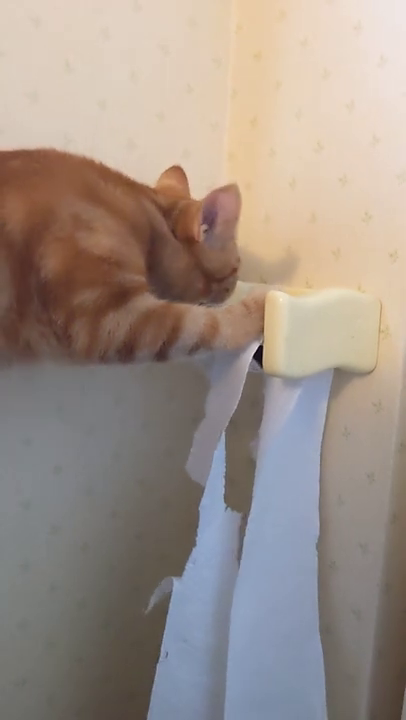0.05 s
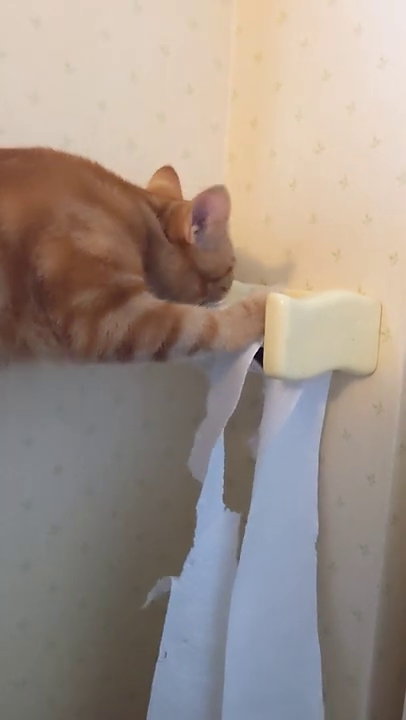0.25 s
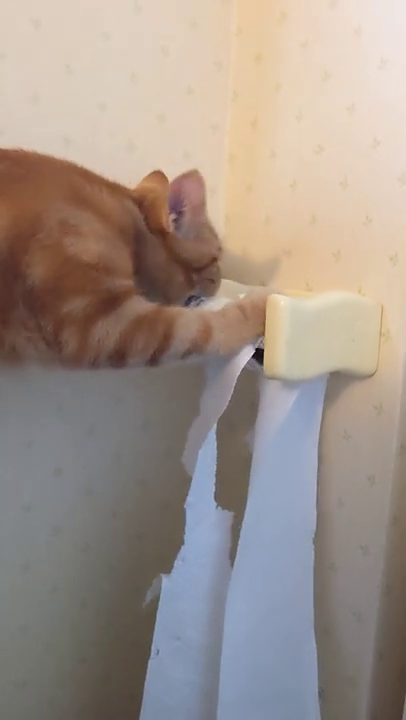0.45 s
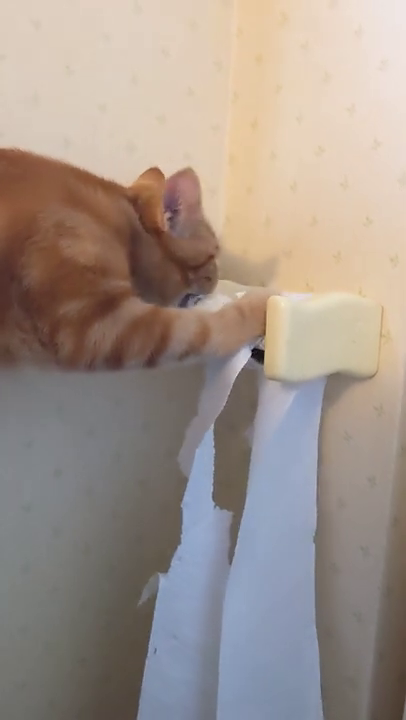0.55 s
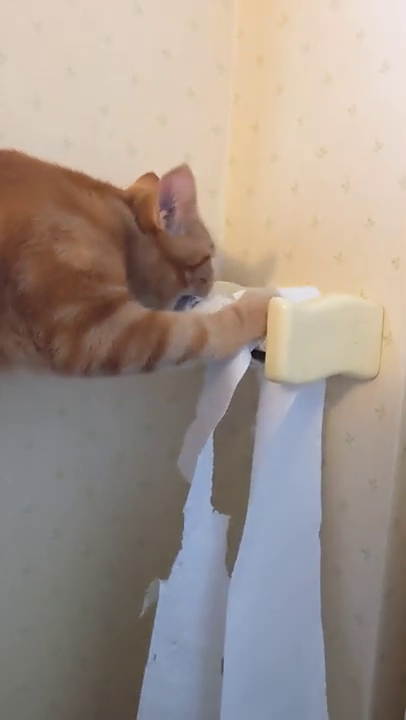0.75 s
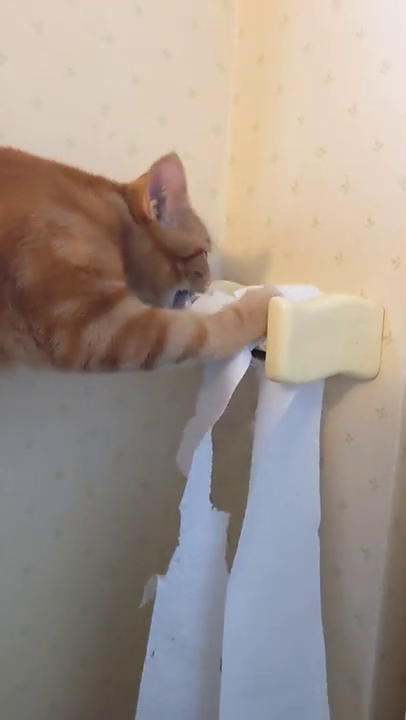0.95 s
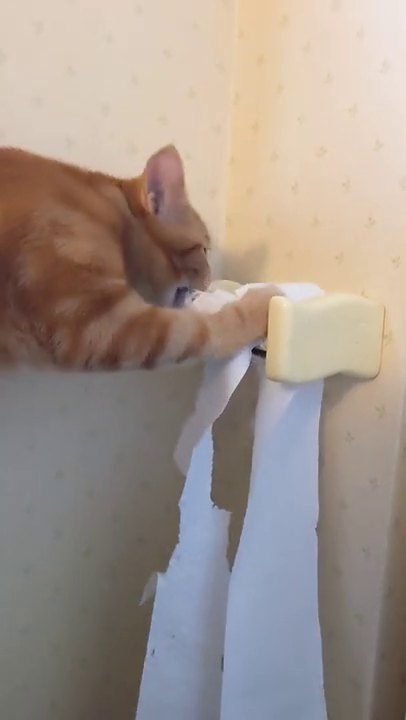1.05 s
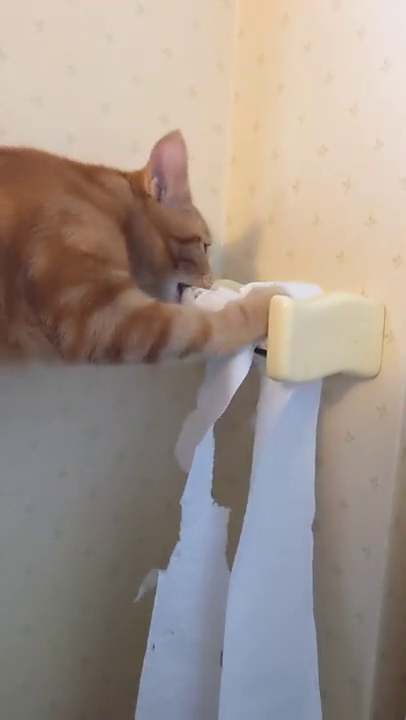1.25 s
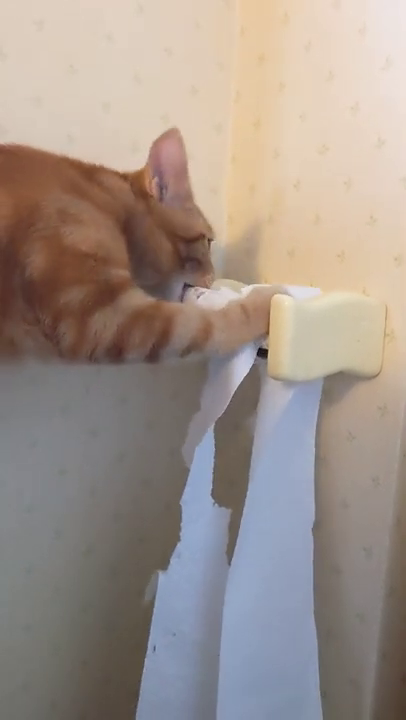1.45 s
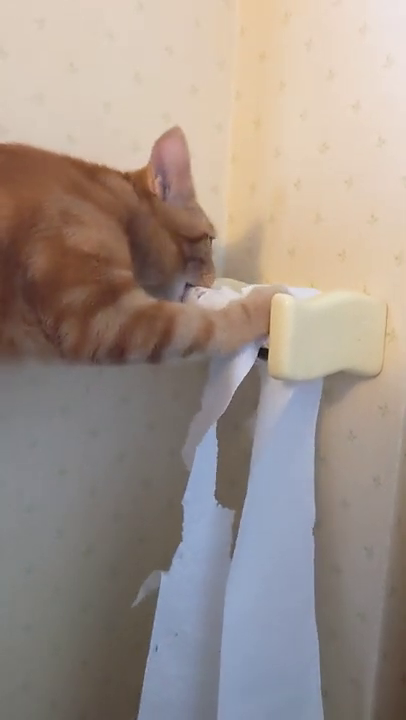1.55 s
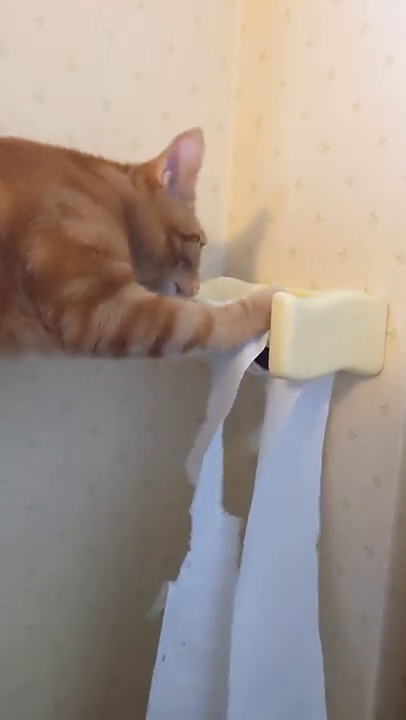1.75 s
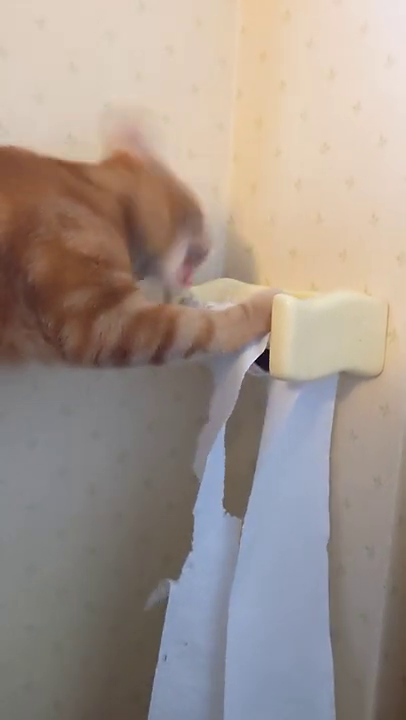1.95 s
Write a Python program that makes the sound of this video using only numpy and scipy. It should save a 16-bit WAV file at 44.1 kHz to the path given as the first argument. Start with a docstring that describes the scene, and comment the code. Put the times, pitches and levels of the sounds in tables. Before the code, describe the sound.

Plastic toilet roll holder knocking as a cat tugs the paper: a dense, uneven rattle of bright clacks with small hollow taps from 0.2 to 0.65 seconds, then near quiet. Faint clicks resume around 1.05, growing to a strong crack at 1.3 with low roll rubbing and soft paper rustle. One clear knock lands at 1.7. Close pickup, short hard-room echo, very faint hum and hiss.

```python
"""Cat tugging toilet paper

A cat tugs toilet paper off a wall holder in a small hard room, heard from a phone held close by.
The spindle slips and knocks in its plastic bracket: sharp pulses, with fading sine waves for bracket and wall.
Pushes of the paw drum the cardboard tube, also as fading sine waves, and each sound gets a room echo.
The roll rubs as it turns and the paper slides softly: both are coloured noise with a moving level.
Behind them lie a low house hum, a wavering sine wave, and noise for the room air and microphone hiss."""
import sys
import numpy as np
from scipy import signal
from scipy.fft import rfft, irfft, next_fast_len
from scipy.io import wavfile
from scipy.ndimage import map_coordinates

SR = 44100
rng = np.random.default_rng(int(sys.argv[2]) if len(sys.argv) > 2 else 0)


def amplitude_ratio(level_db):
    """Convert a level in decibels to the matching linear amplitude (field) ratio."""
    exponent = np.asarray(level_db, float) / 20
    return 10 ** exponent


def to_wav(s):
    """Save 16-bit WAV."""
    ch = np.atleast_2d(s).T  # columns
    pcm = np.round(np.clip(ch, -1, 1) * 32767)  # PCM
    wavfile.write(sys.argv[1], SR, pcm.astype(np.int16))


N = 88200  # samples: two seconds

# House hum over time: (time [s], level [dB])
HUM_LEVEL = [(0, -65), (.5, -61.5), (.9, -59.5), (1.19, -58), (1.23, -60), (1.28, -57.5), (1.65, -60.5),
             (1.8, -55.5), (2, -53)]
# Tone of room air and microphone hiss: (frequency [Hz], relative level [dB])
AIR_TONE = [(20, -15), (40, -25), (75, 2), (130, -6.5), (230, -8), (350, -10), (600, -15), (1100, -17.5),
            (2500, -22.5), (6000, -34), (10500, -49.5), (15500, -58), (16000, -78)]
# Paper sliding over time: (time [s], level [dB])
SLIDING_LEVEL = [(0.0, -66), (0.26, -81), (0.44, -62.5), (0.51, -82), (0.73, -76.5), (0.98, -75),
                 (1.06, -64.5), (1.25, -59), (1.45, -64), (1.71, -66.5), (1.87, -65), (2.0, -103)]
# Tone of the sliding paper: (frequency [Hz], relative level [dB])
PAPER_TONE = [(1000, 0.5), (3500, -0.5), (4800, 5), (6000, 3), (7500, -2.5), (12000, -9), (15500, -6),
              (15900, -45)]
# Roll rubbing on the spindle over time: (time [s], level [dB])
RUB_LEVEL = [(0.0, -59), (0.07, -61.5), (0.41, -61.5), (0.49, -50.5), (0.68, -59), (0.77, -70),
             (1.03, -62.5), (1.15, -64), (1.27, -54), (1.3, -43), (1.42, -54.5), (1.53, -65), (2.0, -62)]
# Tone of the rubbing: (frequency [Hz], relative level [dB])
RUB_TONE = [(70, -30), (130, -14.5), (200, -3.5), (270, 5), (340, 5.5), (420, -6.5), (620, -5.5),
            (900, -20), (1250, -11), (2000, -32.5)]
# Spindle knocks: (time [s], relative crack level [dB], wall thud over it [dB],
# bracket ring over it [dB], brightness [dB per octave])
KNOCKS = [(0.1017, -44.5, 0.5, -7.5, 1.3), (0.225, -49, -20, -17, 5), (0.2324, -26, -6, 4.5, -0.1),
          (.2400, -39.5, 2.5, 4, -5), (0.251, -40.5, -16, 6, 2.5), (0.2948, -29.5, -24, -14, -0.3),
          (.3160, -40, -11, -18, 6), (0.3371, -28, -15.5, -11.5, -2), (0.3639, -35.5, -17, -17, -5),
          (0.3894, -26.5, -16, -12, -1.5), (0.4128, -27, -36, -7.5, -0.4), (0.43, -28.5, -32.5, -20, -1.7),
          (0.4458, -45, -19, -21, 2), (.5260, -23, -25, -10, 0), (0.5948, -30, -39, -8, 1.5),
          (.6380, -27.5, -60, -13.5, -2.5), (0.6425, -32, -24, -7.5, 6), (0.9406, -60, -20, -4, 5),
          (1.0364, -44.5, -19, -10, 4.3), (1.05, -59, -15, -17, 5), (1.0905, -44, -5, -11, 8.5),
          (1.097, -41.5, -7, -8.5, 2), (1.1180, -41, -0.5, -3, -12), (1.1466, -30, -7.5, -8.5, 0.5),
          (1.1739, -31.5, -9.5, -7, -1.2), (1.2454, -30.5, -20, -11.5, 2.5), (1.259, -47, -28, -21, 4),
          (1.2908, -23, -23, -15.5, 4), (1.3770, -38.5, -16, -2.5, 3), (1.4180, -43, -13, -14.5, -1.5),
          (1.7135, -25, -2, -10.5, 5.5), (1.9399, -57, -2, -24, 1)]
# Tone of a crack: (frequency [Hz], relative level [dB])
CRACK_TONE = [(300, -18.5), (800, -23.5), (1300, 4.5), (2100, 3.5), (3200, 0), (4400, -0.5), (5600, -3.5),
              (7100, -5.5), (9000, -15.5), (12000, -20.5), (16000, -18.5)]
# Wall thump: (frequency [Hz], relative level [dB], time to fade by 60 dB [s])
WALL_MODES = [(216.6, -14.5, 0.17), (235, -8, 0.14), (267.2, -2.5, 0.15), (306.6, -2, 0.19),
              (336.5, -0.5, 0.1), (399.6, 1.5, 0.086)]
# Plastic bracket ringing: (frequency [Hz], relative level [dB], time to fade by 60 dB [s])
BRACKET_MODES = [(974, -36, 0.013), (1019.4, -4.5, 0.08), (1099, -9.5, 0.077), (1169, 0, 0.05),
                 (1212, 7, 0.022), (1306, -0.5, 0.076), (1300, -4, 0.016), (1450, -10, 0.057),
                 (1795, -4.5, 0.022), (2090, 1, 0.015)]
# Pushes of the paw on the roll: (time [s], relative level [dB])
PUSHES = [(.103, -50.5), (.234, -33.5), (.254, -37), (.345, -47.5), (.509, -59), (1.105, -51.5),
          (1.25, -47.5), (1.715, -51), (1.79, -58.5), (1.942, -62)]
# Cardboard tube drumming: (frequency [Hz], relative level [dB], time to fade by 60 dB [s])
TUBE_MODES = [(504, -14, 0.05), (543, -11, 0.09), (564.7, 2.5, 0.076), (627, 4.5, 0.071), (696, -10, 0.085),
              (806, -7.5, 0.086), (861.6, -4.5, 0.046)]
# Echoes from near walls: (typical delay [s], typical level [dB])
NEAR_WALLS = [(.0012, -3.5), (.0023, -33), (.0032, -8.5), (.0046, -11.5), (.0077, -2), (.0092, -10)]
# Room echo: (frequency [Hz], time to fade by 60 dB [s])
ROOM_FADE = [(150, 0.26), (500, 0.22), (1200, .22), (4000, 0.25), (8000, 0.3), (11000, 0.37), (15000, 0.15)]
# Left-right likeness of sound from all round: (frequency [Hz], likeness [0 to 1])
ALIKE = [(60, 0.66), (250, 0.96), (500, 0.64), (900, 0.017), (16000, 0.011)]
# Direct sound, left minus right: (frequency [Hz], level difference [dB])
LEFT_MINUS_RIGHT = [(300, -1.5), (620, 11.5), (1100, -6), (2500, -11), (5000, -8.5), (10000, -10.5)]

HUM_HZ, HUM_WAVER_HZ, AIR_DB = 52, 1.32, -65
CRACK_DB, THUD_DB, RING_DB = 6.5, -2.5, -4.5  # added to the knock levels
THUD_RISE_S, RING_RISE_S, PUSH_RISE_S = 0.0044, 0.00031, 0.0012
SCATTER_DB, SCATTER_T60_S = -16, 0.023  # fine reflections off the holder's own edges
CRACK_WET_DB = 5.5  # the crack spreads all round and fills the room more than the rest
ROOM_DB, ROOM_GAP_S, ROOM_LEFT_DB = 2.5, 0.0016, -2.5
# The ringing panels reach the left microphone by a longer way than the crack
LEFT_LAG_S, RING_LAG_S = 0.0001, 0.00028
LOW_CUT_HZ, TOP_HZ = 27.7, 16600


def unit(x):
    """Scale x to an average strength (rms) of 1."""
    return x / np.sqrt(np.mean(x ** 2) + 1e-20)


def along(points, hz):
    """Read (frequency, value) points on a logarithmic frequency axis."""
    f, v = np.transpose(points)
    return np.interp(np.log(hz + 1), np.log(f + 1), v)


def curve(rows):
    """Join (time, value) points by straight lines, one value per sample."""
    s, v = np.transpose(rows)
    return np.interp(np.arange(N) / SR, s, v)


def wobble(rate):
    """A smooth random curve through `rate` random points a second."""
    return map_coordinates(rng.standard_normal(N // 400), [np.arange(N) * rate / SR])


def filtered(x, response):
    """Change the strength and phase of each frequency in x by a response."""
    m = next_fast_len(x.shape[-1] + 4096)
    spectrum = rfft(x, m) * response(np.fft.rfftfreq(m, 1 / SR))
    return irfft(spectrum, m)[..., :x.shape[-1]]


def diffuse(pair, tone):
    """Colour two unrelated signals and mix them to the likeness of sound arriving from all round."""
    def response(hz):
        angle = np.arccos(np.clip(along(ALIKE, hz), -1, 1)) / 2
        return amplitude_ratio(along(tone, hz)) * [np.cos(angle), np.sin(angle)]
    mid, side = filtered(pair, response)
    return np.array([mid + side, mid - side])


def at_phone(x, lag_s):
    """Direct sound from the right: it reaches the left microphone later and with another tone."""
    def response(hz):
        # half of the left-right difference goes to each side
        half = amplitude_ratio(along(LEFT_MINUS_RIGHT, hz) / 2) * np.exp(-1j * np.pi * hz * lag_s)
        return np.array([half, 1 / half])
    return filtered(np.array([x, x]), response)


def causal(gain_db):
    """A pulse of energy 1 with the given tone, its energy as early as possible (minimum phase)."""
    c = irfft(np.log(amplitude_ratio(gain_db)))
    # fold the second half of the cepstrum onto the first
    c[1:len(c) // 2] *= 2
    c[len(c) // 2 + 1:] = 0
    pulse = irfft(np.exp(rfft(c)))
    return pulse / np.linalg.norm(pulse)


def ringing(modes, t, rise_s):
    """Fading sine waves of a body struck once, each with a fresh strength and phase."""
    extra_db = rng.normal(0, 2, len(modes))[:, None]
    phase = rng.normal(0, 0.45, len(modes))[:, None]
    hz, db, t60 = np.transpose(modes)[..., None]
    waves = amplitude_ratio(db + extra_db - 60 * t / t60) * np.sin(2 * np.pi * hz * t + phase)
    return waves.sum(0) * (1 - np.exp(-(t / rise_s) ** 2))


def room(x):
    """Echo from a small hard room: fresh noise in which each frequency dies at its own speed."""
    hz, t, z = signal.stft(rng.standard_normal((2, len(x))), SR, nperseg=256)
    fading = z * amplitude_ratio(-60 * t / along(ROOM_FADE, hz)[:, None])
    tail = signal.istft(fading, SR, nperseg=256)[1][:, :len(x)]
    tail = diffuse(tail / np.linalg.norm(tail[0]), [(150, -6.5), (400, 0), (1000, -0.28)])
    # the left side is duller, mostly above 900 Hz
    tail[0] = filtered(tail[0], lambda f: amplitude_ratio(ROOM_LEFT_DB * f ** 2 / (f ** 2 + 900 ** 2)))
    # the echo builds up just after the direct sound
    tail *= 1 - np.exp(-(np.arange(len(x)) / SR / ROOM_GAP_S) ** 2)
    return amplitude_ratio(ROOM_DB) * signal.fftconvolve(x[None], tail, axes=1)[:, :len(x)]


def background():
    """A low hum wavering in pitch and level, with steady noise for room air and microphone hiss."""
    hum_hz = HUM_HZ + HUM_WAVER_HZ * wobble(7)
    hum = np.sqrt(2) * np.sin(2 * np.pi * np.cumsum(hum_hz) / SR)
    air = unit(diffuse(rng.standard_normal((2, N)), AIR_TONE))
    return amplitude_ratio(curve(HUM_LEVEL) + 2.4 * wobble(6.23)) * hum + amplitude_ratio(AIR_DB) * air


def paper():
    """Soft slide of tissue: uneven noise, part straight from the paper and part from all round."""
    a, b = rng.standard_normal((2, 2, N))
    near = at_phone(diffuse(a, PAPER_TONE).sum(0), LEFT_LAG_S)
    slide = unit(near + 0.9 * diffuse(b, PAPER_TONE))
    return amplitude_ratio(curve(SLIDING_LEVEL) + 3.3 * wobble(24.47)) * slide


def roll():
    """The turning roll rubs unevenly: low noise with the tone of the rubbing and a moving level."""
    rub = unit(diffuse(rng.standard_normal((2, N)), RUB_TONE))
    return amplitude_ratio(curve(RUB_LEVEL) + 1.66 * wobble(40.02)) * rub


def near_reflections(t):
    """Short paths of a crack: direct, scattered off the holder's edges, and echoed by near walls."""
    paths = amplitude_ratio(SCATTER_DB - 60 * t / SCATTER_T60_S) * rng.standard_normal(len(t))
    paths[0] = 1
    for delay_s, echo_db in NEAR_WALLS:
        place = round(delay_s * SR * rng.uniform(0.94, 1.06))
        paths[place] += amplitude_ratio(echo_db + rng.normal(0, 2))
    return paths


def knock(db, thud_db, ring_db, tilt_db, t):
    """One slip of the spindle: a crack and a wall thump (direct, then as fed to the room), and a ring."""
    hz = np.fft.rfftfreq(1024, 1 / SR)
    tone_db = along(CRACK_TONE, hz) + tilt_db * np.log2((hz + 50) / 3000)
    pulse = amplitude_ratio(db + CRACK_DB) * causal(tone_db)[:256]
    crack = np.pad(pulse, (0, len(t) - 256))
    thud = amplitude_ratio(db + THUD_DB + thud_db) * ringing(WALL_MODES, t, THUD_RISE_S)
    ring = amplitude_ratio(db + RING_DB + ring_db) * ringing(BRACKET_MODES, t, RING_RISE_S)
    near = signal.fftconvolve(near_reflections(t), crack)[:len(t)] + thud
    return near, amplitude_ratio(CRACK_WET_DB) * crack + thud, ring


def holder():
    """Each knock cracks, rings the bracket and thumps the wall; each push drums the cardboard tube."""
    sharp, rings, wet = np.zeros(N + SR), np.zeros(N + SR), np.zeros((2, N + SR))
    t = np.arange(SR // 2) / SR
    silence = 0 * t
    sounds = []
    for s, db in PUSHES:
        sounds.append((s, silence, silence, amplitude_ratio(db) * ringing(TUBE_MODES, t, PUSH_RISE_S)))
    for s, db, thud_db, ring_db, tilt_db in KNOCKS:
        sounds.append((s, *knock(db, thud_db, ring_db, tilt_db, t)))
    for s, near, spread, ring in sounds:
        start = round(s * SR)
        span = slice(start, start + len(t))
        sharp[span] += near
        rings[span] += ring
        wet[:, span] += room(spread + ring)
    return at_phone(sharp[:N], LEFT_LAG_S) + at_phone(rings[:N], RING_LAG_S) + wet[:, :N]


def scene():
    """All the sounds together at the phone's two microphones."""
    return background() + paper() + roll() + holder()


def top_cut(x):
    """Nothing passes above the cut-off."""
    return signal.sosfilt(signal.butter(12, 17000, fs=SR, output="sos"), x)


def record(dry):
    """The phone's recording: the deepest bass fades out and nothing passes above the top frequency."""
    def response(hz):
        return (hz < TOP_HZ) * hz ** 4 / (hz ** 4 + LOW_CUT_HZ ** 4)
    mix = filtered(dry, response)
    return top_cut(mix)


dry = scene()
out = record(dry)
to_wav(out)
```